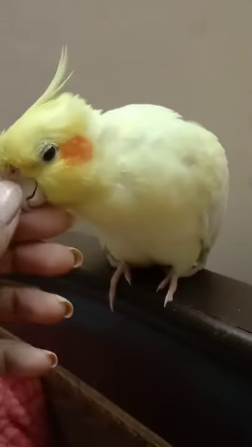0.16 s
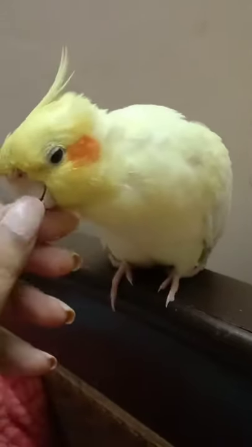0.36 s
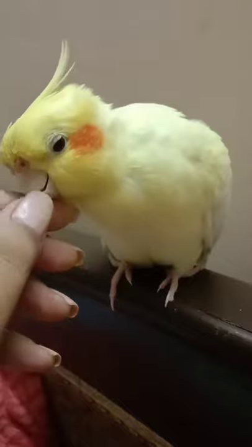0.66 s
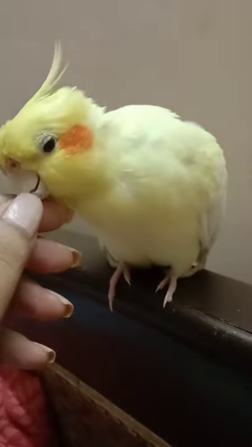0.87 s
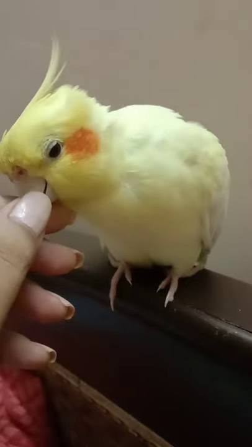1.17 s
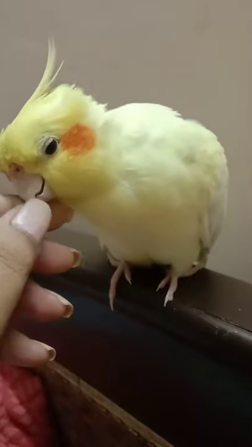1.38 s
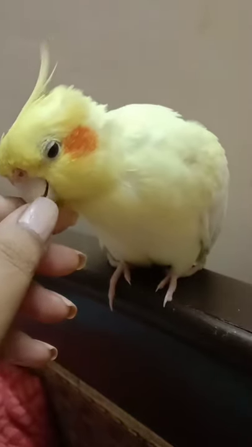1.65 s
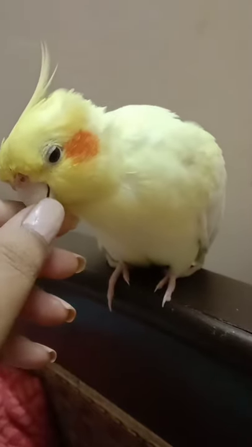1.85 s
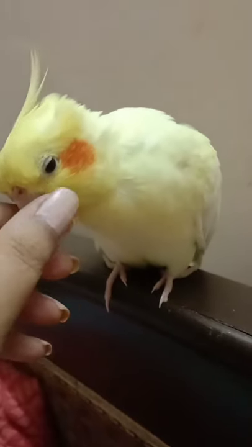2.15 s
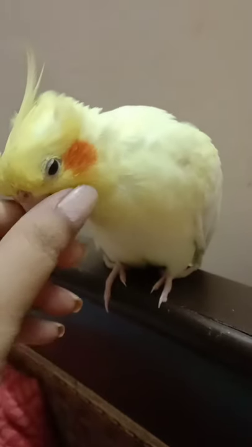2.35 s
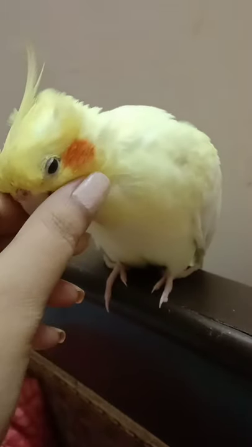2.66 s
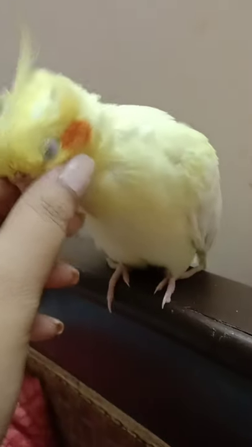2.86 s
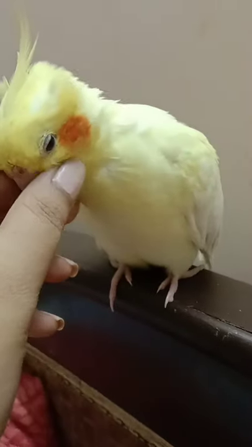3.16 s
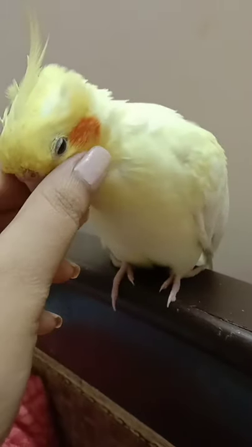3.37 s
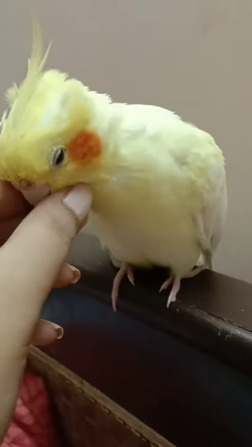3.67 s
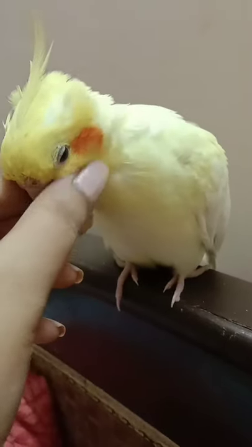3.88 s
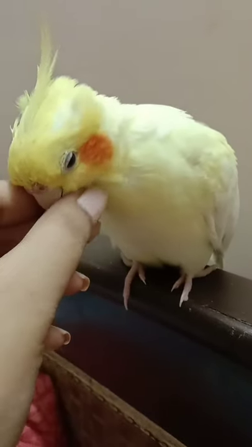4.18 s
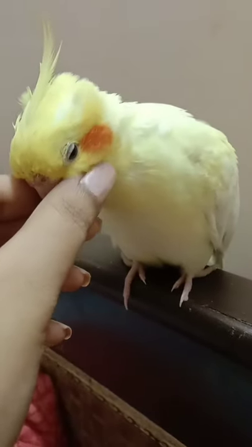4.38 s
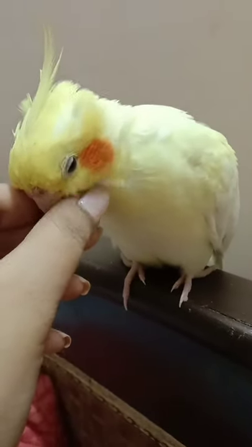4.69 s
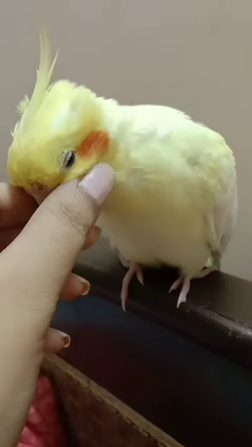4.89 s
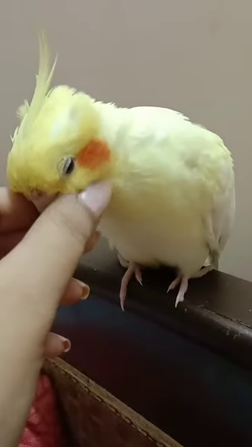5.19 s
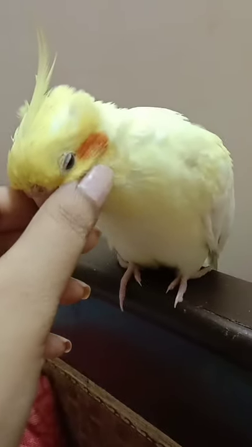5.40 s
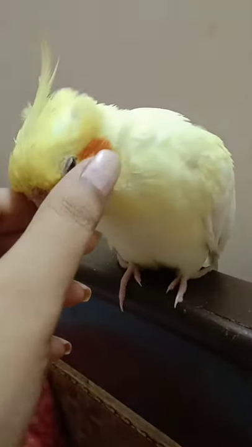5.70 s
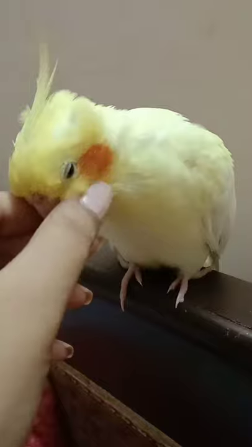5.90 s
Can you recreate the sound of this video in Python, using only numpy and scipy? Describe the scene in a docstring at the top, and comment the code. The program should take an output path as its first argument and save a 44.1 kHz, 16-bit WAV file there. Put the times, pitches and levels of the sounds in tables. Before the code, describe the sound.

A cockatiel is close to the microphone in a small, hard-walled room. At about 0.3 seconds it gives a short, high two-part chirp that leaps upward, breaks and ends on a raspy falling note, slightly smeared by the walls. A very soft squeak comes at 1.8 seconds. From about 3.1 to 3.3 seconds comes a second, slightly louder two-part chirp, after which something metal rings thinly and faintly for about a second. The chirps are by far the loudest sounds. Fingers brush feathers in faint rustles from about 1.1 to 3.7 seconds and again after 5.2. A hand bumps a chair with faint hollow knocks around 1.3, 2.2, 3.7 and 4.3 seconds. Throughout, a quiet, high fan hiss swells about three times a second over a low rumble with soft, dull thuds.

```python
"""A small hard-walled room: a pet cockatiel, close by, gives two two-part chirps as its cheek is stroked.
Each chirp is a whistle of the syrinx that leaps upward, breaks and ends on a raspy falling note.
The walls smear the glides, and something metal rings on after the loudest chirp.
Behind it a hiss swells at an even beat, as from a ceiling fan, over a low rumble with dull thuds.
Fingers brush the feathers, and the hand bumps faintly against a chair."""
import sys
import numpy as np
from scipy import signal
from scipy.fft import rfft, irfft, next_fast_len
from scipy.io import wavfile
from scipy.ndimage import uniform_filter1d, map_coordinates

SR = 44100
rng = np.random.default_rng(int(sys.argv[2]) if len(sys.argv) > 2 else 0)


def log_audio(samples):
    """Write samples as a 16-bit WAV file to the path given in sys.argv[1]."""
    # one column per channel
    frames = np.atleast_2d(samples).T
    # limit to full scale, then quantise
    limited = np.clip(frames, -1, 1)
    pcm = np.round(limited * 32767).astype(np.int16)
    wavfile.write(sys.argv[1], SR, pcm)


N = 266364


def amp(db):
    """Decibels to gain."""
    return 10 ** (np.asarray(db) / 20)


def unit(x):
    """Scale to rms 1."""
    return x / np.sqrt(np.mean(x ** 2) + 1e-20)


def along(points, hz):
    """Interpolate (f/Hz, value) points on a log axis."""
    f, values = np.transpose(points)
    return np.interp(np.log(hz + 1), np.log(f + 1), values)


def curve(points):
    """Interpolate (t/s, value) points at every sample."""
    times, values = np.transpose(points)
    return np.interp(np.arange(N) / SR, np.sort(times), values)


def wobble(rate_hz, size=SR // 4):
    """Smooth random curve, rms 1."""
    knots = rng.standard_normal(int(size * rate_hz / SR) + 4)
    return unit(map_coordinates(knots, [np.arange(size) * rate_hz / SR]))


def filtered(x, response):
    """Apply a gain given as a function of f/Hz."""
    size = next_fast_len(len(x) + 8192)
    return irfft(rfft(x, size) * response(np.fft.rfftfreq(size, 1 / SR)), size)[:len(x)]


def noise(colour, size=N):
    """Noise of the given spectrum, rms 1."""
    return unit(filtered(rng.standard_normal(size), lambda hz: amp(along(colour, hz))))


def patchy(x, depth_db):
    """Random gain patches, about 170 Hz by 80 ms; output rms 1."""
    spectrum = signal.stft(x, nperseg=512)[2]
    field = uniform_filter1d(rng.standard_normal(spectrum.shape), size=2, axis=0)
    field = uniform_filter1d(field, size=14, axis=1)
    return unit(signal.istft(spectrum * amp(depth_db * unit(field)), nperseg=512)[1][:N])


def centred(colour, centre_hz, slope_db):
    """Weight a spectrum toward centre_hz."""
    return [(hz, db - slope_db * np.log2(hz / centre_hz) ** 2) for hz, db in colour]


def add(out, start_s, x):
    """Mix x into out."""
    part = out[round(start_s * SR):][:len(x)]
    part += x[:len(part)]


HISS_LEVEL = [(0.0, -65), (0.17, -65.5), (0.8, -60), (2.9, -63), (3.75, -61.5), (4.95, -67), (5.25, -63),
              (6.04, -66)]  # fan hiss before the swell: t/s, level/dB
# spectra of the hiss, its lower edge and still air: f/Hz, level/dB
HISS_SPECTRUM = [(1760, -56), (3000, -26), (3420, -14), (4150, -27), (4330, -18), (4510, -38), (5010, -25),
                 (5290, 0.5), (5870, 3.5), (8130, 6), (9400, -5.5), (11500, -5), (12700, -2), (14100, 5),
                 (15700, -5)]
EDGE_SPECTRUM = [(2500, -42), (3150, -19.5), (3450, -5), (3750, -3), (4150, -5.5), (4400, 4.5),
                 (4750, -2.5), (5100, -14), (6000, -43)]
AIR_SPECTRUM = [(100, -5), (250, -0.5), (400, -10), (630, -17), (1400, -14.5), (2200, -18), (3200, -20.5),
                (5000, -23), (8000, -51.5)]

def fan_and_air(turn_hz=3.285, first_dip_s=0.175, depth=0.8, edge_db=-19, air_db=-77):
    """Hiss that dips once per turn of the fan, over still air."""
    turn = 2 * np.pi * turn_hz * (np.arange(N) / SR - first_dip_s)
    swell = np.sqrt(1 - depth * np.cos(turn))
    hiss = swell * patchy(noise(HISS_SPECTRUM), depth_db=2.5)
    lower_edge = amp(edge_db) * swell ** 2 * patchy(noise(EDGE_SPECTRUM), depth_db=5)
    air = amp(air_db) * patchy(noise(AIR_SPECTRUM), depth_db=3.5)
    return amp(curve(HISS_LEVEL)) * (hiss + lower_edge) + air


RUMBLE_FLOOR = [(0, -69.5), (1.9, -77.5), (3.1, -75), (3.4, -71), (4.6, -71.5), (4.85, -78.5), (5.3, -68),
                (5.7, -77.5)]  # rumble between thuds: t/s, level/dB
RUMBLE_SPECTRUM = [(20, -36), (32, -26.5), (50, -14), (65, -18.5), (86, -9), (105, 5), (150, -6.5),
                   (200, -8.5), (260, -27.5), (350, -36.5), (600, -60.5)]  # f/Hz, level/dB
THUD_PEAKS = [(.05, -65), (.44, -54.5), (.63, -62.5), (1.54, -69.5), (2.38, -67), (2.855, -60.5),
              (3.24, -61.5), (3.635, -60.5), (5.2, -62), (5.336, -62.5), (5.856, -68)]  # t/s, level/dB

def rumble(waver_db=1.0, thud_half_s=0.032):
    """Low wavering rumble that swells into dull thuds, as of a hand shifting."""
    t = np.arange(N) / SR
    floor = amp(curve(RUMBLE_FLOOR) + waver_db * wobble(10, size=N))
    thuds = sum(amp(db) * np.exp(-((t - peak_s) / thud_half_s) ** 2) for peak_s, db in THUD_PEAKS)
    return np.hypot(floor, thuds) * noise(RUMBLE_SPECTRUM)


def gesture(t, length_s, first_hz, last_hz):
    """Pitch and strength of a note: scoops in from the relaxed syrinx, glides, sags as the air stops."""
    rest_hz, scoop_s, sag = 2550, 0.0013, 0.069
    attack_s, release_s = 0.0021, 0.0041
    release = np.clip((t - length_s) / release_s, 0, 1)
    glide = first_hz + (last_hz - first_hz) * np.minimum(t / length_s, 1)
    scoop = (rest_hz - first_hz) * np.exp(-t / scoop_s)
    strength = np.minimum(t / attack_s, 1) * (1 - release) ** 2
    return (glide + scoop) * (1 - sag * release), strength


HARMONICS = [(2, 8), (3, 1), (4, -6), (5, -14.5)]  # syrinx overtones: multiple, relative level/dB

def whistle(note, swing=0.1, flutter_db=3, churn=0.52, breath_db=-24, tail_s=0.0041):
    """One note of the syrinx; rasp shakes its pitch and strength and adds turbulence."""
    length_s, first_hz, last_hz, db, fade_db, rasp, overtone_db = note
    size = int((length_s + tail_s) * SR)
    t = np.arange(size) / SR
    hz, strength = gesture(t, length_s, first_hz, last_hz)
    shake, flutter, eddies = (wobble(rate_hz)[:size] for rate_hz in (1400, 700, 3500))
    breath = rng.standard_normal(SR // 4)[:size]
    phase = 2 * np.pi * np.cumsum(hz * (1 + swing * rasp * shake)) / SR
    overtones = sum(amp(level) * np.sin(k * phase) * (k * hz < SR / 2) for k, level in HARMONICS)
    turbulence = rasp * (churn * eddies * np.cos(phase) + amp(breath_db) * breath)
    envelope = strength * amp(db - fade_db * t / length_s + flutter_db * rasp * flutter)
    return envelope * (np.sin(phase) + amp(overtone_db) * overtones + turbulence)


def syllable(notes, leak_db=-18):
    """A run of notes; the tuned throat passes little below their lowest starting pitch."""
    out = np.zeros(N)
    for start_s, *note in notes:
        add(out, start_s, whistle(note))
    lowest_hz = min(first_hz for _, _, first_hz, *_ in notes)
    throat = [(0.84 * lowest_hz, leak_db), (lowest_hz, 0)]
    return filtered(out, lambda hz: amp(along(throat, hz)))


# notes, grouped by syllable:
# t/s, length/s, first f/Hz, last f/Hz, source level/dB, fade/dB, rasp/0-1, overtone gain/dB
CHIRP_NOTES = [
    [(.301, 0.006, 2250, 2099, -27.5, 1.5, .1, -19.5), (.308, .014, 4350, 4414, -24.5, 2, .6, -15.5),
     (.321, .009, 4500, 4260, -18.5, 2.5, .75, -24.5), (.325, 0.029, 6050, 6427, -18, 5.5, 0.2, -21)],
    [(.405, 0.0063, 2230, 2370, -21.5, 0, .05, -32), (.419, 0.014, 2480, 2987, -25.5, 0, .45, -10),
     (.431, .010, 3400, 5510, -24.5, 3.5, .5, -23), (.440, .017, 5850, 6023, -25.5, 1.5, .15, -25),
     (.458, .028, 3820, 3672, -25, 1, 0.3, -20), (.487, .014, 2000, 1843, -32, 7, 0.3, -17)],
    [(1.807, 0.0146, 2300, 2510, -57, 6.5, 0.9, -21), (1.824, .04, 3700, 3600, -58.5, 10, 0.9, -25.5)],
    [(3.074, .011, 3700, 4023, -29, 2, .2, -24), (3.084, 0.008, 4050, 3990, -20, 1, 0.3, -26.5),
     (3.087, 0.025, 5350, 5445, -22, 2, 0.4, -25.5), (3.115, 0.062, 4920, 5350, -22.5, 0.5, .25, -24)],
    [(3.185, 0.022, 2680, 2614, -25, 2, 0.2, -19), (3.213, 0.02, 2600, 2605, -35, 0, 0.8, -9),
     (3.231, 0.0093, 5900, 5590, -23.5, -1.5, .7, -20), (3.239, .021, 5300, 4076, -18, 2.5, .95, -22.5),
     (3.258, .031, 3680, 3514, -17, 5, .45, -22)],
]
BEAK_RESPONSE = [(300, -9), (600, -3), (900, 11), (1400, 1.5), (2000, -2.5), (6300, -2.5), (8000, -1),
                 (9500, -9.5), (13000, -5), (16000, -1)]  # f/Hz, gain/dB

def cockatiel():
    """Two chirps with a soft squeak between them, coloured by the beak."""
    voice = sum(syllable(notes) for notes in CHIRP_NOTES)
    return filtered(voice, lambda hz: amp(along(BEAK_RESPONSE, hz)))


ROOM_DECAY = [(150, 0.41), (1000, 0.18), (3500, 0.31), (7000, 0.35), (15000, 0.22)]  # diffuse tail: f/Hz, t60/s

def room(x, walls_db=0.5, tail_db=-2, build_s=0.022, echoes=12):
    """Direct sound, sharp echoes from hand, chair and near walls, and a diffuse tail."""
    hz, t, spectrum = signal.stft(rng.standard_normal(SR), SR, nperseg=256)
    decay = amp(-60 * t / along(ROOM_DECAY, hz)[:, None])
    tail = signal.istft(spectrum * decay * (1 - np.exp(-t / build_s)), SR, nperseg=256)[1]
    delays_s = np.geomspace(0.0012, 0.028, echoes) * rng.uniform(0.85, 1.15, echoes)
    walls = np.bincount((delays_s * SR).astype(int), rng.uniform(0.61, 1, echoes), len(tail))
    response = amp(walls_db) * walls / np.linalg.norm(walls) + amp(tail_db) * tail / np.linalg.norm(tail)
    return x + signal.fftconvolve(x, response)[:N]


MODES = [(882, -63.5, .5), (1570, -61.5, .5), (2677, -70, .45), (3604, -68, .4), (3800, -73, .4)]  # room impulse response: f/Hz, level/dB, t60/s

def room_modes(x):
    """Narrow resonances of the room, driven by x."""
    t = np.arange(SR) / SR
    modes = sum(amp(db - 60 * t / t60_s) * np.sin(2 * np.pi * hz * t) for hz, db, t60_s in MODES)
    return signal.fftconvolve(x, modes)[:N]


STROKE_PEAKS = [(1.146, -76.5, 1610), (1.47, -74, 3447), (1.87, -62, 3170), (2.181, -63.5, 1900),
                (2.348, -69.5, 3970), (3.363, -62.5, 1450), (3.72, -71, 1080), (5.25, -74, 4000),
                (5.474, -70.5, 3870), (5.838, -73.5, 1390)]  # t/s, level/dB, centre f/Hz
FEATHER_SPECTRUM = [(200, -23), (700, 3.5), (1000, -2), (1300, -6.5), (1550, 9.5), (1850, -5.5), (2350, -1),
                    (2900, -8), (3500, -3.5), (4400, 4.5), (5200, -14), (9000, -22.5)]  # f/Hz, level/dB

def feather_strokes(half_s=0.054):
    """Fingers brush over feathers; each rustle swells and fades."""
    out, t = np.zeros(N), np.arange(-SR // 4, SR // 4) / SR
    for peak_s, db, centre_hz in STROKE_PEAKS:
        rustle = noise(centred(FEATHER_SPECTRUM, centre_hz, slope_db=3), size=len(t))
        add(out, peak_s + t[0], rustle * amp(db) * np.exp(-(t / half_s) ** 2))
    return np.std(out) * patchy(out, depth_db=4.5)


BUMPS = [(1.299, -55, 870, 0.026, 337, -5), (2.183, -58, 530, 0.0068, 191, -1.5),
         (2.318, -62, 433, 0.0093, 400, 2), (3.553, -65, 810, 0.008, 431, 3.5),
         (3.745, -52, 1020, 0.00084, 288, -4.5), (4.285, -59, 850, 0.021, 224.5, 8)]  # t/s, relative level/dB, centre f/Hz, rise/s, thump f/Hz, thump gain/dB
CHAIR_SPECTRUM = [(100, -31), (220, 13.5), (300, 4), (430, 8), (610, -18), (860, -7.5), (1400, 3),
                  (1800, -10), (2050, 1.5), (2500, -56), (4500, -33), (7000, -43), (15000, -38.5)]  # f/Hz, level/dB

def chair_bumps(clatter_t60_s=0.16, thump_t60_s=0.15):
    """The hand bumps the chair: a hollow thump under a short clatter."""
    out, t = np.zeros(N), np.arange(SR // 2) / SR
    for start_s, db, centre_hz, rise_s, thump_hz, thump_db in BUMPS:
        clatter = noise(centred(CHAIR_SPECTRUM, centre_hz, slope_db=3.9), size=len(t))
        clatter *= amp(-60 * t / clatter_t60_s)
        thump = amp(thump_db - 60 * t / thump_t60_s) * np.sin(2 * np.pi * thump_hz * t)
        add(out, start_s, amp(db) * (1 - np.exp(-t / rise_s)) * (clatter + thump))
    return out


def metal_ring(start_s=3.25, hz=3122, db=-54, rise_s=0.02, t60_s=1.4, beat_hz=5.9, drift_rad=0.35):
    """Something metal rings on; two close modes beat, one slightly unsteady."""
    t = np.maximum(np.arange(N) / SR - start_s, 0)
    mode = np.sin(2 * np.pi * hz * t + drift_rad * wobble(45, size=N))
    partner = 0.6 * np.sin(2 * np.pi * (hz + beat_hz) * t)
    return amp(db - 60 * t / t60_s) * (1 - np.exp(-t / rise_s)) * (mode + partner)


def scene():
    """Bird and bumps through the room, other layers dry; mono."""
    bird = amp(1.3) * cockatiel()
    bumps = amp(3) * chair_bumps()
    mix = room(bird + bumps) + room_modes(bird) + metal_ring()
    return (mix + feather_strokes() + fan_and_air() + rumble())[None]


def record(dry, top_hz=15830):
    """Brick-wall low-pass."""
    return filtered(dry[0], lambda hz: hz < top_hz)[None]


dry = scene()
out = record(dry)
log_audio(out)
```